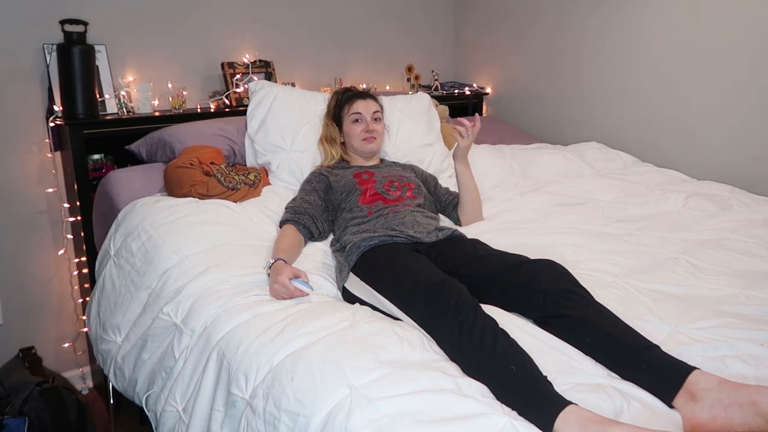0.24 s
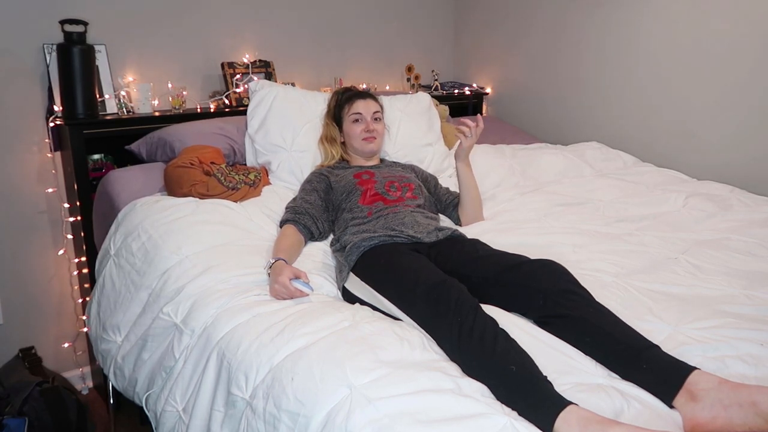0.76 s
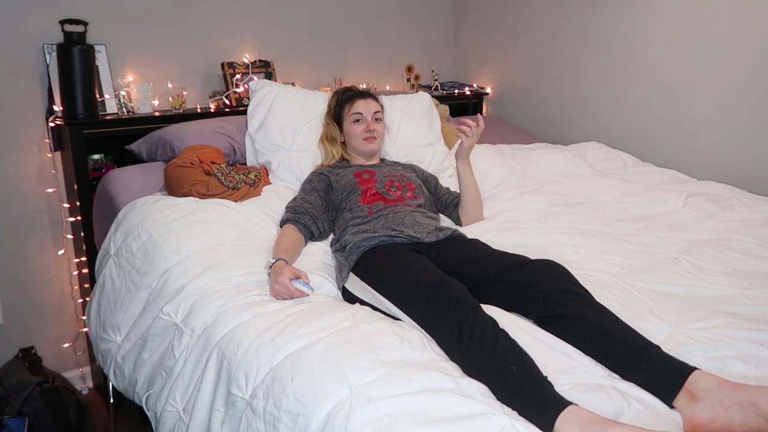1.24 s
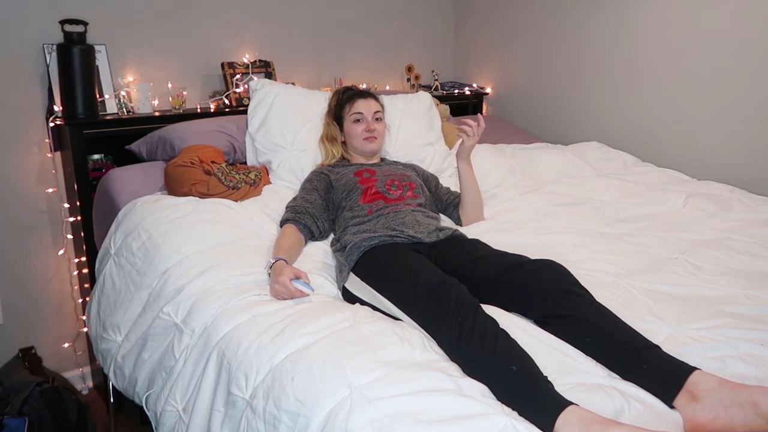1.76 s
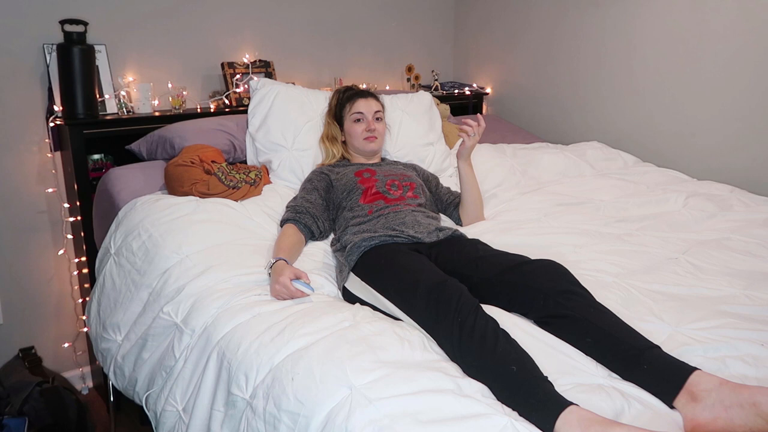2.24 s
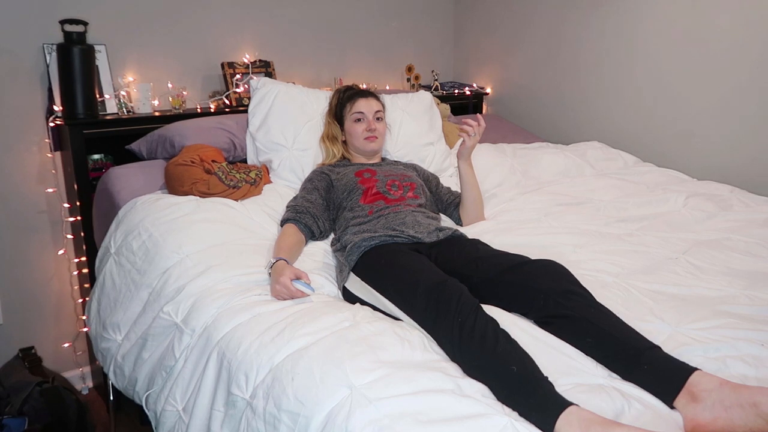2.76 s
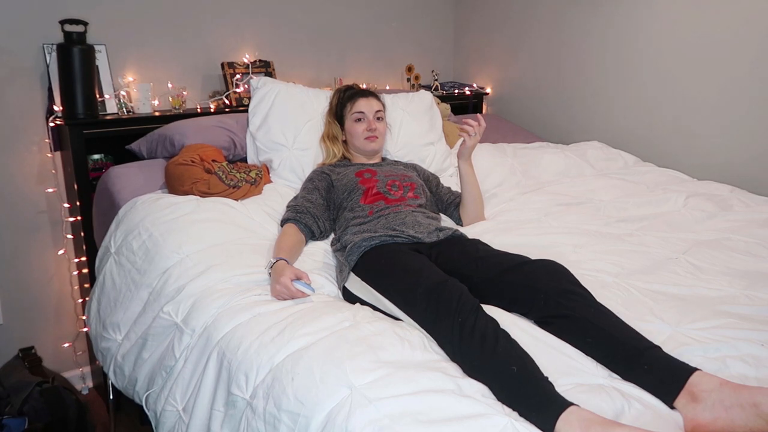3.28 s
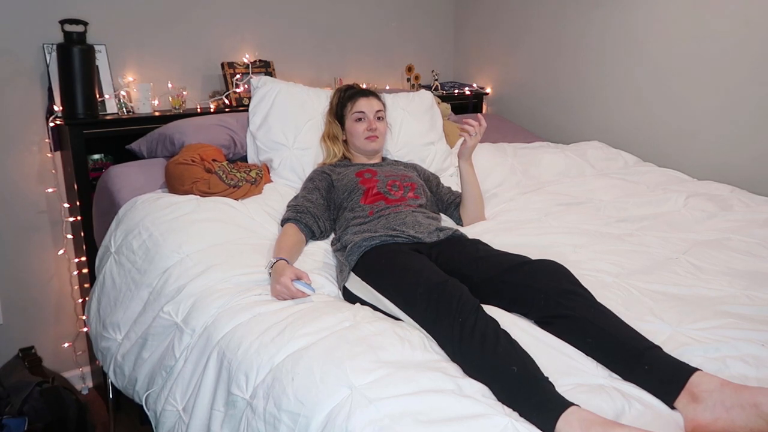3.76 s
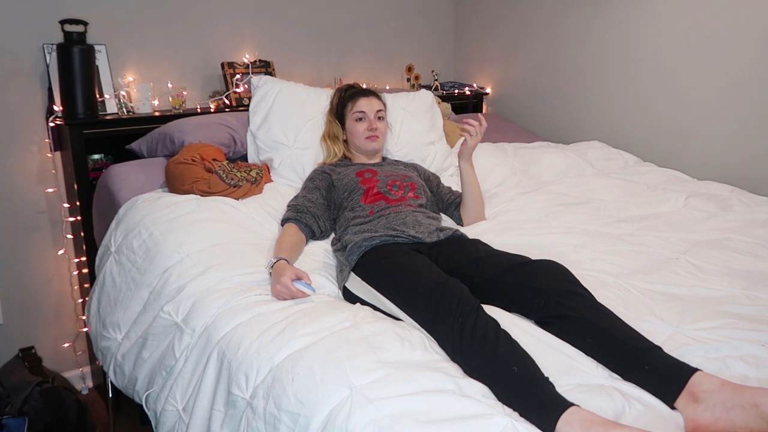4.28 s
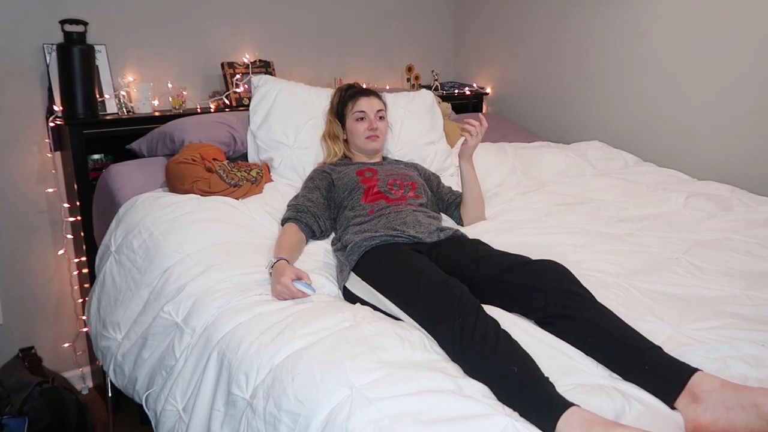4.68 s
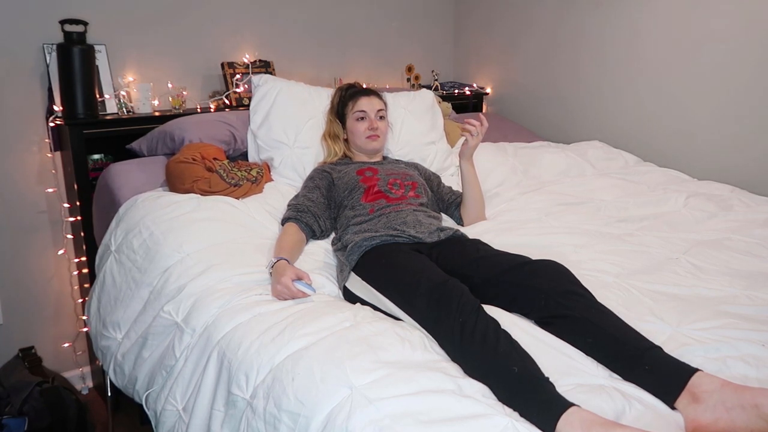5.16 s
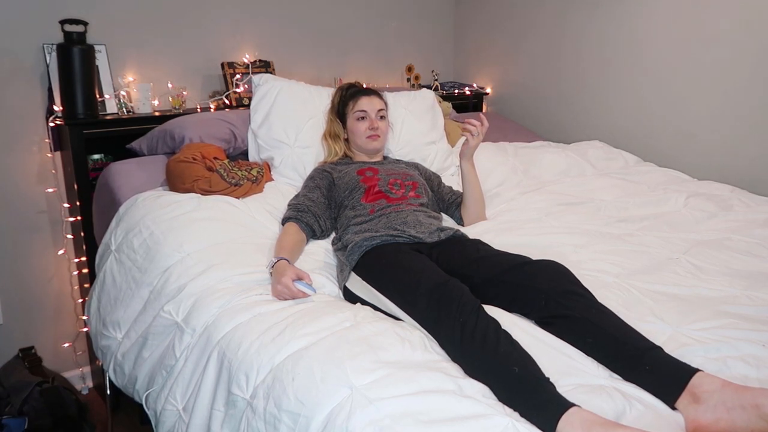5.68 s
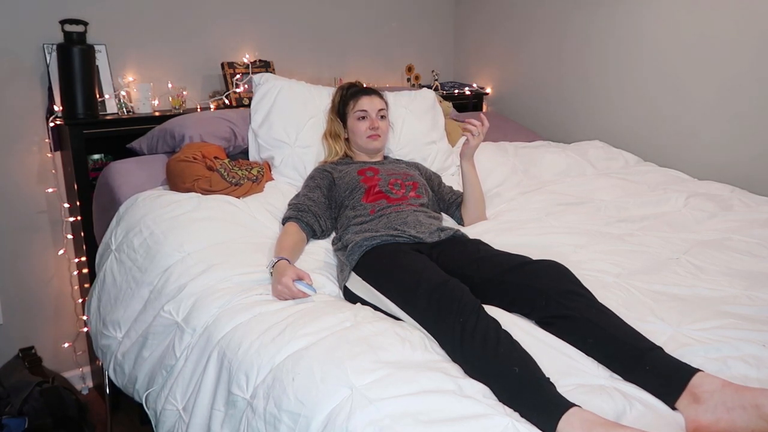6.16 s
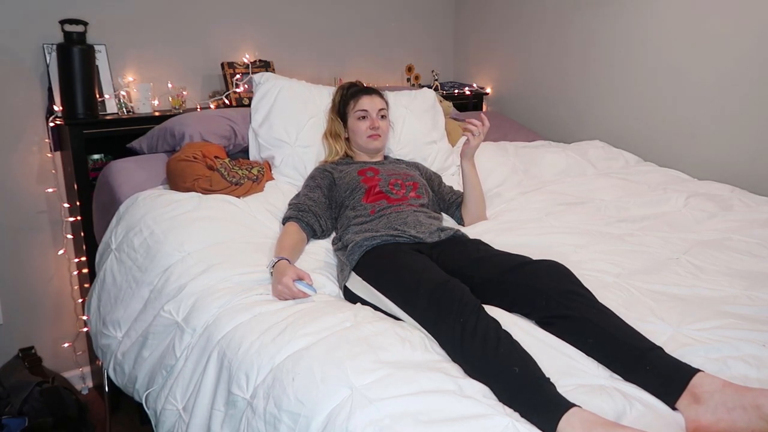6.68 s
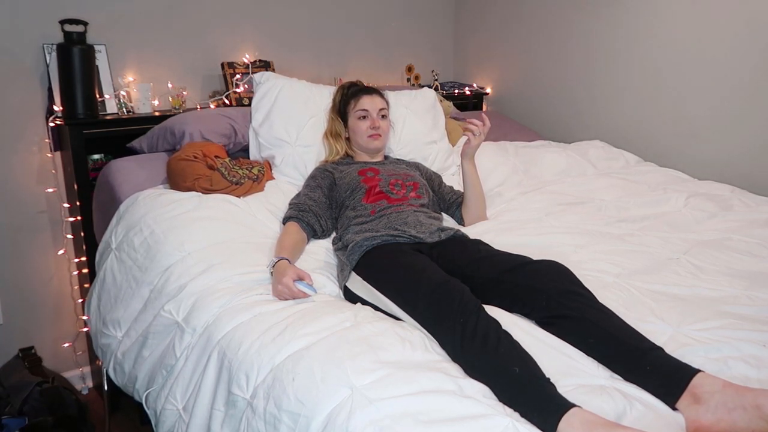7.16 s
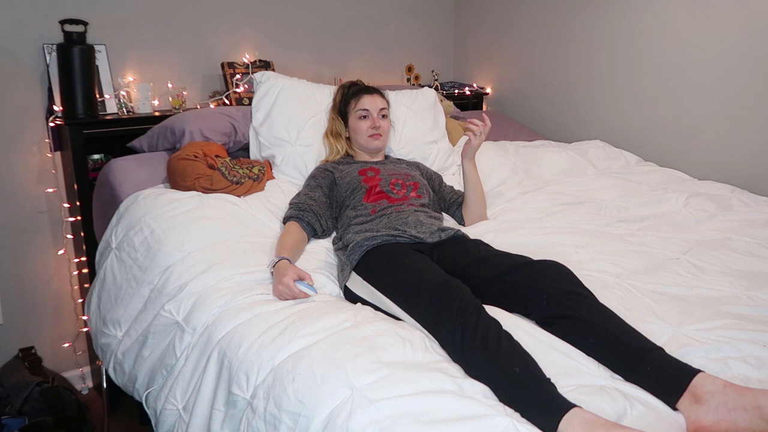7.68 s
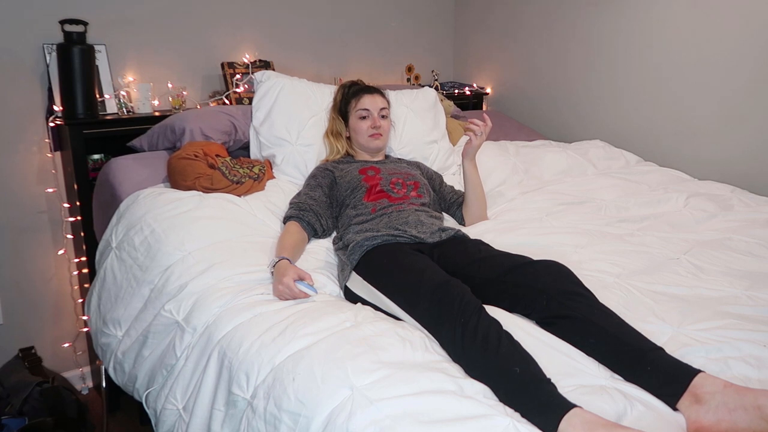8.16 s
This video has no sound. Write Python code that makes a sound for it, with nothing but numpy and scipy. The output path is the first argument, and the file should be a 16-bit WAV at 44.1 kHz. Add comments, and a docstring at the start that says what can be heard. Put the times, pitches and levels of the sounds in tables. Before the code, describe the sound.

A small electric air pump runs without pause in a furnished bedroom, heard close in stereo. A loud buzzing motor drone sits within dense rushing air. It swells slightly over the first second, changes tone near 2.5 seconds, loses most of its high whine around 4, and shifts again near 6.5 as the whine returns.

```python
"""A small electric air pump in a furnished bedroom, near the bed; two close microphone ports hear it from the left.
Drone and rushing air swell in over the first second, with a soft low bump at 0.07 s: tones locked to a brush
motor of some 377 turns a second, their 120 Hz mains sidebands, and noise coloured by housing and room.
The tones change balance around 2.5 s; the 16-blade whine sinks near 4 s, and a fainter bump comes at 4.9 s.
The balance changes again around 6.5 s; the whine is back and the shaft fastest, near 378 turns a second, by the end."""
import sys
import numpy as np
from scipy import signal
from scipy.fft import rfft, irfft, next_fast_len
from scipy.io import wavfile
from scipy.ndimage import uniform_filter1d

SR = 44100
rng = np.random.default_rng(int(sys.argv[2]) if len(sys.argv) > 2 else 0)


def put_to_file(sound):
    """Save the sound as 16-bit audio at rate SR, in the file named by the first command-line argument."""
    columns = np.atleast_2d(sound).T  # one column per channel
    safe = np.clip(columns, -1, 1)
    whole_steps = np.round(safe * 32767)
    wavfile.write(sys.argv[1], SR, whole_steps.astype(np.int16))


N = 371322   # samples

# Echo level of the bedroom against the direct sound: (f/Hz, level/dB)
ROOM_ECHO = [(30, -18), (3800, -17), (4400, -11)]
ROOM_T60_S = .3

# Rushing air before the opening swell: (t/s, level/dB, treble tilt/dB)
AIR_LEVEL = [(0, -27, 0), (1.5, -27, 0.5), (4.5, -26.5, 0), (8.42, -27, 0.7)]
# Broad spectrum of the air, relative only: (f/Hz, density/dB per Hz)
AIR_SPECTRUM = [(25, -88.5), (50, -77), (150, -76), (300, -68), (600, -66), (1000, -62.5), (1400, -61.5),
                (2100, -64.5), (2750, -61.5), (3200, -65.5), (4300, -72), (5550, -78.5), (5900, -76.5),
                (6200, -78), (7000, -82), (8200, -82.5), (11000, -89.5), (14800, -105)]
# Housing and room peaks and dips: (f/Hz, width/Hz, level/dB)
AIR_RESONANCES = [(93, 11, 5.5), (171, 14, -7.5), (198.7, 13, 8.5), (230, 14, -6), (258, 18, 2.5),
                  (266.7, 28, 7.5), (320, 14, 4.5), (353.5, 15, 10.5), (412, 22, -8.5), (446, 13, 4),
                  (490, 8, -5), (495.5, 12, 5.5), (524, 12, 6), (600, 12, -6.5), (628, 12, 1.5),
                  (676, 29, -4.5), (738.4, 18, 4.5), (776, 12, 5.5), (836, 12, 2.5), (848, 21, -4),
                  (846, 14, 1.5), (977, 26, -6.5), (1060, 18, -5), (1109, 11, 5), (1161, 22, 4.5),
                  (1278, 30, 6), (1341, 16, -7.5), (1360, 14, 6), (1449, 22, 10.5), (1525, 16, 11.5),
                  (1542, 44, -7), (1827, 98, -5.5), (2020, 14, 6), (2050, 16, 0.5), (2150, 20, 3),
                  (2184, 57, 2.5), (2281, 21, 7.5), (2748, 67, 5.5), (2890, 55, 5), (3025, 140, -5),
                  (3170, 30, -1.5), (3250, 66, -3), (3490, 20, 2), (3550, 70, -2.5), (3900, 24, 5),
                  (3990, 85, -7), (2765, 36, 4.5), (5400, 160, -2.5), (5780, 60, 2), (5830, 37, 2),
                  (6350, 190, -1)]
RESONANCES_BELOW_HZ = 6600
# Air balance between the ports: (f/Hz, left-right level/dB)
PORT_BALANCE = [(150, 0), (400, .6), (800, -.6), (1200, 1.5), (2500, .8), (3600, 2), (7000, 1), (8400, 0)]
# Air that each port hears alone, against the shared air: (f/Hz, level/dB)
UNSHARED_AIR = [(30, -55), (60, -42), (130, -18), (200, -18), (450, -20), (800, -11), (1200, -15),
                (1800, -9), (2500, -12), (4000, -2), (7000, -4), (8200, -10), (9500, -20)]
# Phase between the ports: (f/Hz, left lead/rad)
LEFT_LEAD = [(30, 0), (100, 0), (300, .07), (2500, .2), (3400, .94), (4500, 1.5), (7000, 2), (8400, np.pi),
             (14000, np.pi)]
SHAFT_THROB, MAINS_THROB, THROB_FROM_HZ = .2, .02, 3000   # depths of the treble's throb, as gain

# Two soft low bumps: (t/s, f/Hz, glide/Hz per s, peak level/dB, length/s)
LOW_BUMPS = [(0.072, 198, 350, -38, 0.04), (4.937, 55, -2, -46, 0.025)]

# Shaft speed, creeping up as the wedge fills: (t/s, speed/turns per s)
SHAFT_SPEED = [(0.0, 376.7), (0.4, 376.38), (0.7, 375.95), (1.2, 376.38), (1.5, 376.1), (2.0, 376.18),
               (2.4, 376.57), (3.0, 376.85), (3.6, 376.88), (4.0, 377.22), (4.4, 377.1), (4.6, 377.33),
               (5.0, 377.23), (5.2, 376.94), (5.6, 377.22), (6.0, 377.33), (6.6, 377.78), (7.2, 378.01),
               (7.8, 377.98), (8.2, 378.2), (8.42, 378.18)]
MAINS_PULSE_HZ = 120
# Opening swell of the air and most tones: (t/s, gain/dB)
OPENING_SWELL = [(0, -3.5), (.2, -3), (.45, -1), (.8, 1), (1.1, 0.5)]
STRONG_SWELL_SHARE = 1.07   # strong tones swell in more deeply than the air
FLICKER_DB, TREMBLE_DB, FLICKER_PER_S = 4, .8, 22   # mains sidebands; shaft multiples; rate of both
WAVER_PER_S = 3
EVEN_WAVER_DB, STRONG_WAVER_DB, WHINE_WAVER_DB = 1.02, .2, .3   # first two grow as root of the shaft multiple
# Tones of even balance, before trim and swell: (shaft multiple, mains steps, level/dB, left-right level/dB)
EVEN_PARTIALS = [(1, -1, -51, 0), (2, -1, -53, 1), (2, 1, -51, 0), (3, 1, -52, 3), (4, 1, -44, 1),
                 (5, 1, -48, 0), (9, -1, -53, 1), (9, 1, -47, 2), (10, -1, -52, 2), (11, 1, -58, 2),
                 (12, -1, -57, 1), (13, -1, -55, 3), (13, 1, -59, 3), (14, -1, -59, 1), (15, -1, -64, 3),
                 (15, 1, -58, 1), (16, -1, -61, 0), (21, -1, -70, 1), (21, 0, -68, 1), (23, 0, -72, 0),
                 (26, 0, -71, 0), (28, 0, -73, 0), (29, 0, -73, 0), (30, 0, -71, 0), (31, 0, -75, 0),
                 (32, 0, -64, 0), (33, 0, -80, 0), (34, 0, -79, 0), (35, 0, -81, 0), (36, 0, -84, 0),
                 (40, 0, -79, 0)]
EVEN_TRIM_DB = -2
# Strong tones: (shaft multiple, mains steps)
STRONG_PARTIALS = [(1, 0), (2, 0), (3, 0), (4, 0), (5, 0), (6, 0), (7, 0), (7, 1), (8, 0), (8, 1), (9, 0),
                   (10, 0), (11, 0), (13, 0), (12, 0), (14, 0), (15, 0), (17, 0), (20, 0), (5, -1), (10, 1)]
# One row for each strong tone, before the swell: (level/dB, first change/dB, second change/dB)
STRONG_BALANCE = [(-29.5, 1.5, 1.2), (-39.5, 0, -3.5), (-44, -5.5, 7.5), (-26, 0.24, -9.5),
                  (-33.5, 0.8, -13), (-35.5, -2, -0.2), (-37.5, 0, 0.5), (-44, -0.86, 4), (-45.5, 1, -0.5),
                  (-49.5, 6, 0), (-41, 1.5, -1.5), (-49, 6, -9.5), (-55.5, 6.5, -6), (-51, -3, -8),
                  (-58, -5, 3), (-56.5, 2, 1), (-63, -0.5, -3), (-57, -8, 2.5), (-59.5, -3.5, 2),
                  (-46.5, 0, -6.5), (-47, 0.5, -4)]
# The two changes of balance: (middle t/s, spread/s)
BALANCE_SHIFTS = [(2.5, 0.27), (6.45, 0.34)]
# Strong tones at the ports before, between and after the shifts: (3 left-right levels/dB, 3 left leads/rad)
STRONG_POSITIONS = [(1, 1, 1, .08, .08, .04), (1, -3, -6, .1, .1, .1), (4, 0, 0, .1, 0, -.1),
                    (0, -1, 3, 0, -.1, .2), (3, 5, 9, .4, .6, 1), (0, 0, -1, 0, 0, -.2),
                    (1, 1, 2, .1, .1, .3), (3, 2, 2, .3, .1, .2), (2, -2, -6, -1.8, 0, -1.8),
                    (1, 2, 1, -.2, .5, .3), (3, 3, 2, 1.4, 1, .6), (1, 2, 2, -1.3, .5, 1.1),
                    (-1, 5, 3, -.9, 1.6, 1.4), (3, 2, -2, 2, 1.7, 0), (0, 4, 3, .1, 1, 2.4),
                    (0, 2, 1, 3.1, 3, 3.2), (-4, 3, 0, -.9, 1.1, 1.1), (1, 1, 3, 2.3, 3.1, 1.7),
                    (0, 2, 0, 3.1, 2.2, 2.9), (2, 3, 3, .3, .3, .2), (3, 4, 4, 2.2, 1.9, 1.6)]
# Blade whine, fading and shifting as its reflections interfere: (t/s, level/dB, left lead/rad, left-right level/dB)
BLADE_WHINE = [(0.0, -43, 2.5, 2), (0.26, -37, 2.4, 2), (0.45, -38, 2.4, 1), (0.57, -34, 1.7, 2),
               (0.69, -33.5, 3.1, 0), (0.84, -34.5, 2.6, 1), (0.9, -36.5, 2, 2), (1.05, -32.5, 1.6, 3),
               (1.18, -38.5, 1.8, 2), (1.26, -36, 2.4, 1), (1.33, -37.5, 2.3, 2), (1.42, -33.5, 1.5, 2),
               (1.56, -34.5, 2.1, 2), (1.67, -31, 1.7, 2), (1.78, -32.5, 1.5, 2), (1.86, -30.5, 1.6, 2),
               (2.04, -32, 1.5, 2), (2.18, -37.5, 1.4, 2), (2.3, -37.5, 2.2, 2), (2.35, -35, 2.3, 1),
               (2.46, -38, 2, 2), (2.6, -36.5, 1.7, 3), (2.84, -37, 1.5, 1), (2.97, -42.5, .7, 1),
               (3.1, -37.5, 1.4, 2), (3.2, -45, .8, 1), (3.41, -38, 1.1, 2), (3.56, -43, .5, 1),
               (3.61, -40.5, .6, 1), (3.68, -40.5, 1.1, 2), (3.78, -47, .1, 0), (3.9, -49, .5, 1),
               (4.05, -58, 2, 0), (4.14, -50, .5, 1), (4.23, -42, .5, 1), (4.31, -41, .2, 1),
               (4.41, -45.5, .2, 1), (4.47, -53, .3, 1), (4.52, -46, .5, 1), (4.6, -55, 1, 1),
               (4.72, -47, .8, 2), (4.8, -49, 1.2, 2), (4.87, -46, 1.2, 2), (4.97, -49, 1.6, 3),
               (5.13, -39.5, 1, 2), (5.23, -47, 1.2, 3), (5.3, -40, 1.6, 1), (5.42, -44.5, 1, 1),
               (5.6, -42, 2.7, 1), (5.65, -39, 2.5, 1), (5.71, -39.5, 1.8, 2), (5.79, -38, 1.6, 2),
               (5.85, -41.5, 1.7, 3), (5.92, -39.5, 2.5, 2), (6.02, -42.5, 2.9, 1), (6.08, -41, 3, 0),
               (6.13, -47, 3.3, -1), (6.18, -40, 3.3, 0), (6.26, -39.5, 3.5, -1), (6.41, -40, 3.5, -1),
               (6.46, -48, 3.3, 0), (6.51, -42.5, 2, 2), (6.55, -41, 1.9, 2), (6.65, -44.5, 2.4, 1),
               (6.73, -48, 2.5, 1), (6.82, -40, 1.4, 3), (6.86, -38, 1.2, 2), (6.94, -45, 1.7, 3),
               (7.05, -37.5, 1, 2), (7.58, -36.5, .8, 1), (7.7, -37.5, 1.4, 2), (7.76, -41, 1.4, 3),
               (7.84, -36, .9, 2), (7.94, -38.5, 1.2, 2), (8.01, -35.5, 1, 2), (8.15, -34.5, .2, 1),
               (8.42, -35, .2, 0)]
BLADES = 16

CUTOFF_HZ = 15100


def amp(db):
    """Decibels to gain."""
    return 10 ** (np.asarray(db, float) / 20)


def in_time(rows):
    """Columns of a curve table, one value a sample."""
    t, *columns = np.transpose(rows)
    return [np.interp(np.arange(N) / SR, t, column) for column in columns]


def at_hz(points, hz):
    """A spectrum table read on a log frequency axis."""
    table_hz, values = np.transpose(points)
    return np.interp(np.log(hz), np.log(table_hz), values)


def drift(per_s):
    """Slow random wander of spread 1: averaged noise knots every 100 samples, joined by lines."""
    knots = rng.standard_normal(N // 100 + 2)
    knots = uniform_filter1d(knots, size=max(int(SR / 200 / per_s), 1))
    return np.interp(np.arange(N) / 100, np.arange(len(knots)), knots / knots.std())


def room(hz, size):
    """Direct sound plus a dying scatter of echoes, which leaves a ragged spectrum."""
    echoes = rng.standard_normal(SR) * amp(-60 * np.arange(SR) / SR / ROOM_T60_S)
    echoes /= np.sqrt(np.sum(echoes ** 2))
    return 1 + amp(at_hz(ROOM_ECHO, hz)) * rfft(echoes, size)


def air(turns):
    """Turbulence through housing and room resonances at two ports; its treble throbs with shaft and mains."""
    size = next_fast_len(N)
    hz = np.arange(1, size // 2 + 2) * SR / size
    shared, left, right = rfft(rng.standard_normal((3, N)), size)

    colour_db = at_hz(AIR_SPECTRUM, hz)
    below = hz[hz < RESONANCES_BELOW_HZ]
    for f, width, db in AIR_RESONANCES:
        colour_db[:len(below)] += db * np.exp(-.5 * ((below - f) / (width / 2)) ** 2)

    # each port takes half of the level and phase difference
    half = amp(at_hz(PORT_BALANCE, hz) / 2) * np.exp(.5j * at_hz(LEFT_LEAD, hz))
    own = amp(at_hz(UNSHARED_AIR, hz))
    ports = np.array([(shared + own * left) * half, (shared + own * right) / half])
    ports /= np.sqrt(1 + own ** 2)
    rush = irfft(ports * amp(colour_db) * room(hz, size), size)[:, :N]
    rush /= rush.std()

    level_db, tilt_db = in_time(AIR_LEVEL)
    swell_db, = in_time(OPENING_SWELL)
    lowpass = signal.butter(2, THROB_FROM_HZ, fs=SR, output="sos")
    low = signal.sosfiltfilt(lowpass, rush)
    treble = rush - low
    throb = 1 + SHAFT_THROB * np.cos(2 * np.pi * turns)
    throb += MAINS_THROB * np.cos(2 * np.pi * MAINS_PULSE_HZ * np.arange(N) / SR)
    return amp(level_db + swell_db) * (low + amp(tilt_db) * throb * treble)


def bumps():
    """Short bell-shaped swells of a gliding low sine, equal at both ports."""
    t = np.arange(N) / SR
    out = np.zeros(N)
    for middle, hz, glide, peak_db, length in LOW_BUMPS:
        since = t - middle
        cycles = (hz + glide * since / 2) * since
        out += amp(peak_db) * np.exp(-(since / length) ** 2) * np.sin(2 * np.pi * cycles)
    return out


def tone(turns, multiple, steps, level_db, pan_db, lead, waver_db):
    """One partial at both ports: reflections waver it, brush sparking flickers mains sidebands."""
    cycles = multiple * turns + steps * MAINS_PULSE_HZ * np.arange(N) / SR + rng.random()
    sides = np.array([[.5], [-.5]])   # left, right
    # the plain shaft tone does not tremble
    flicker_depth_db = FLICKER_DB if steps else TREMBLE_DB * (multiple > 1)
    moving_db = level_db + waver_db * drift(WAVER_PER_S) + flicker_depth_db * drift(FLICKER_PER_S)
    height = np.sqrt(2) * amp(moving_db) * amp(sides * pan_db)   # levels are RMS
    return height * np.sin(2 * np.pi * cycles + sides * lead)


def motor():
    """All tones locked to the shaft, some shifted by the torque pulse of the mains."""
    speed, = in_time(SHAFT_SPEED)
    turns = np.cumsum(speed) / SR
    swell_db, = in_time(OPENING_SWELL)

    whine_db, whine_lead, whine_pan_db = in_time(BLADE_WHINE)
    out = tone(turns, BLADES, 0, whine_db, whine_pan_db, whine_lead, WHINE_WAVER_DB)

    t = np.arange(N) / SR
    first, second = [.5 + .5 * np.tanh((t - middle) / spread) for middle, spread in BALANCE_SHIFTS]
    stages = [1 - first, first - second, second]
    for (k, steps), (db, first_db, second_db), place in zip(STRONG_PARTIALS, STRONG_BALANCE, STRONG_POSITIONS):
        pan_db, lead = np.reshape(place, (2, 3)) @ stages
        level_db = db + STRONG_SWELL_SHARE * swell_db + first_db * first + second_db * second
        out += tone(turns, k, steps, level_db, pan_db, lead, STRONG_WAVER_DB * k ** .5)

    for k, steps, db, pan_db in EVEN_PARTIALS:
        lead = at_hz(LEFT_LEAD, k * speed.mean() + steps * MAINS_PULSE_HZ)
        level_db = db + EVEN_TRIM_DB + swell_db
        out += tone(turns, k, steps, level_db, pan_db, lead, EVEN_WAVER_DB * k ** .5)
    return out, turns


def scene():
    """Motor tones over the rush of air, with the two bumps."""
    tones, turns = motor()
    return tones + air(turns) + bumps()


def record(dry):
    """A steep elliptic low-pass cuts the top at both ports."""
    lowpass = signal.ellip(10, .5, 70, CUTOFF_HZ, fs=SR, output="sos")   # ripple and stopband in dB
    return signal.sosfilt(lowpass, dry)


dry = scene()
out = record(dry)
put_to_file(out)
```